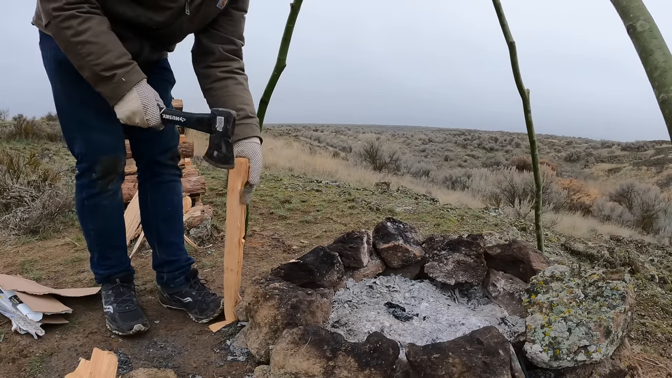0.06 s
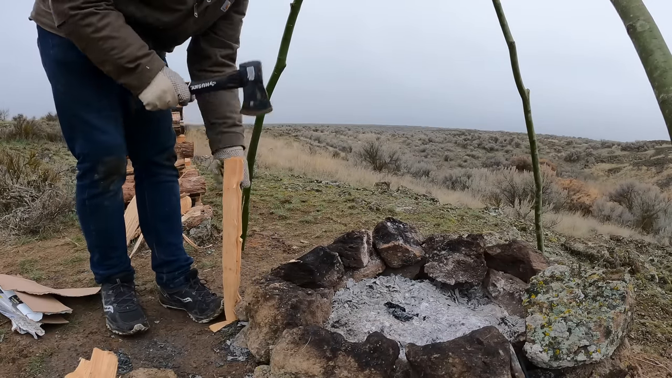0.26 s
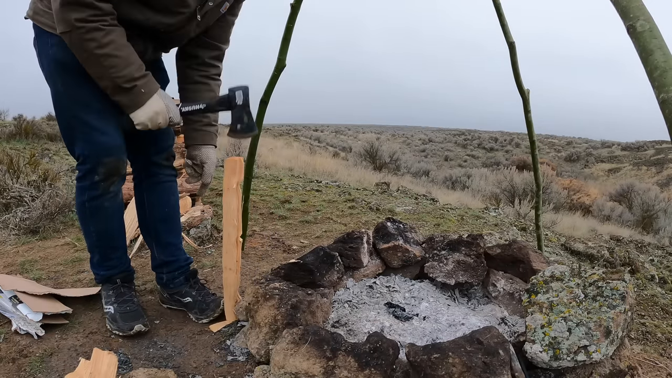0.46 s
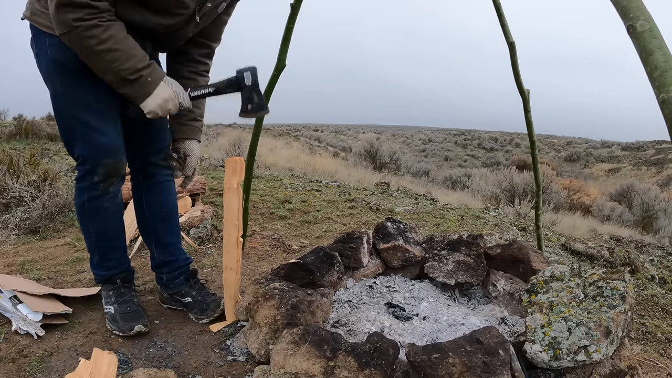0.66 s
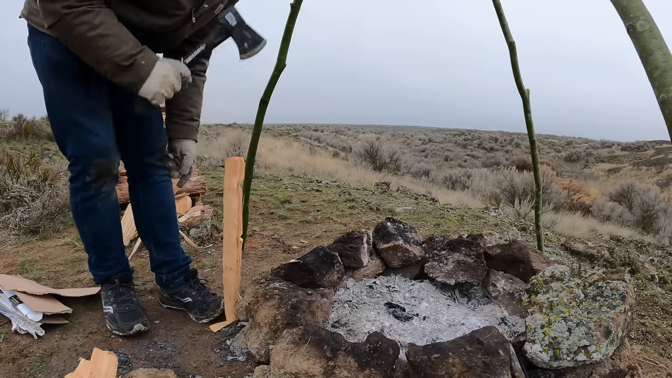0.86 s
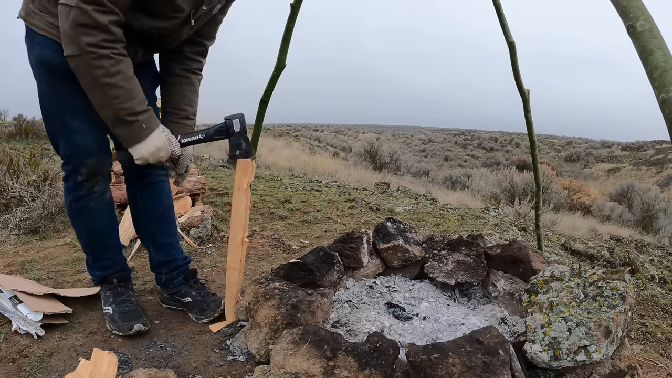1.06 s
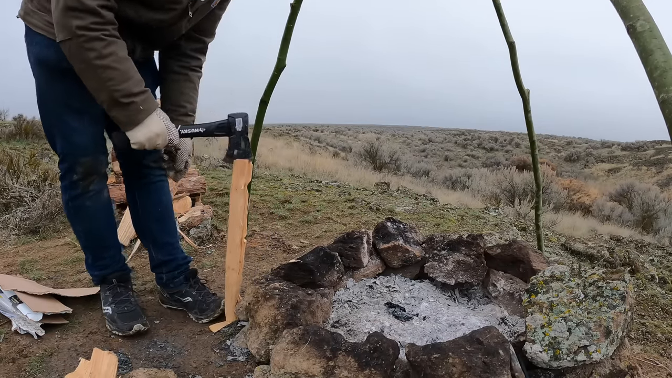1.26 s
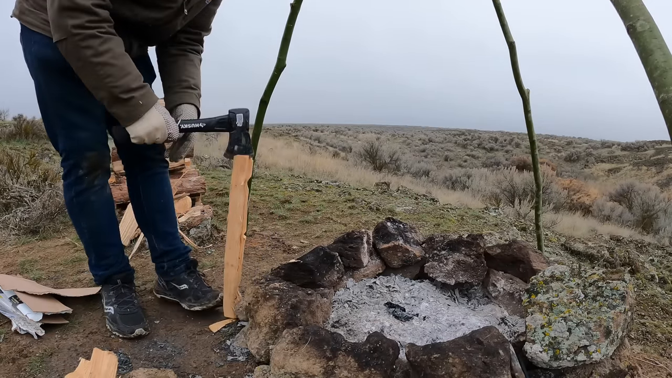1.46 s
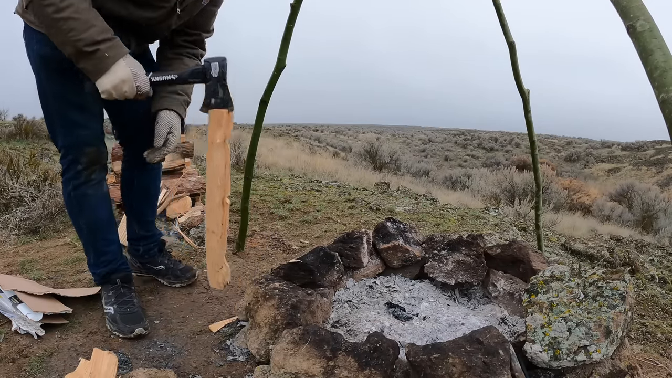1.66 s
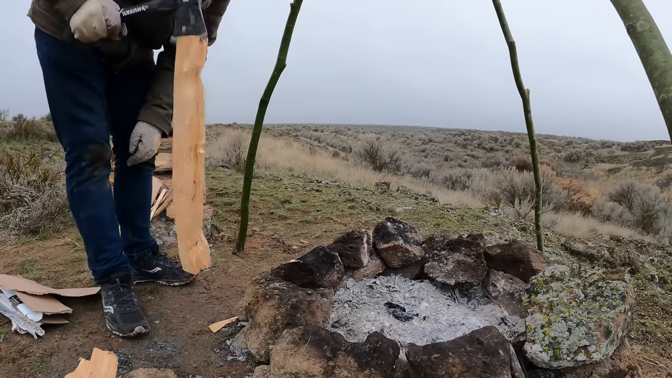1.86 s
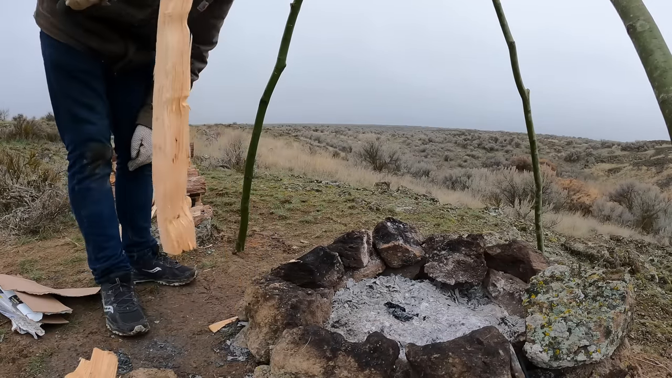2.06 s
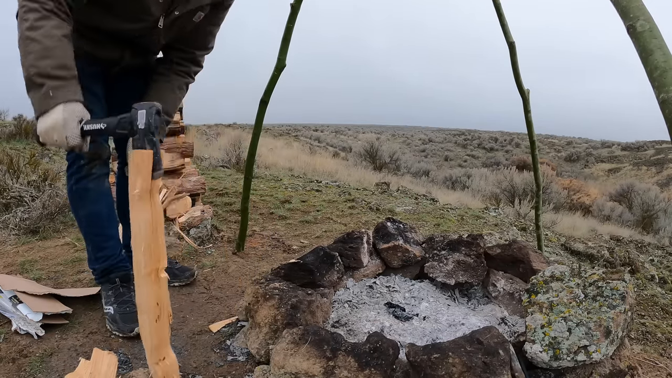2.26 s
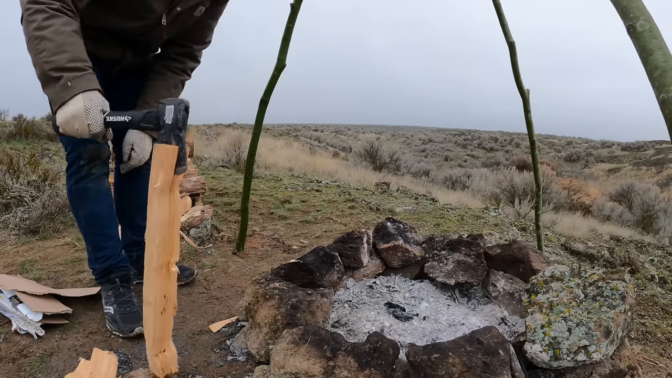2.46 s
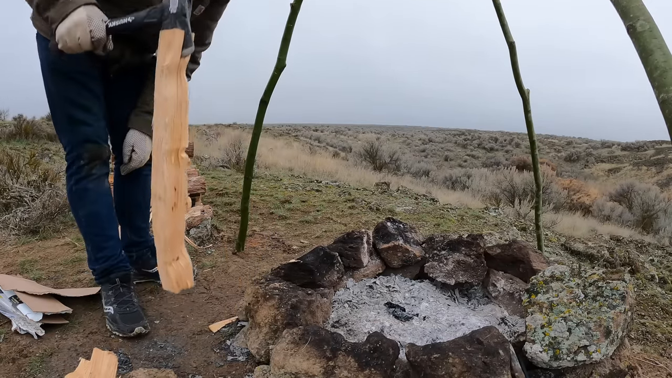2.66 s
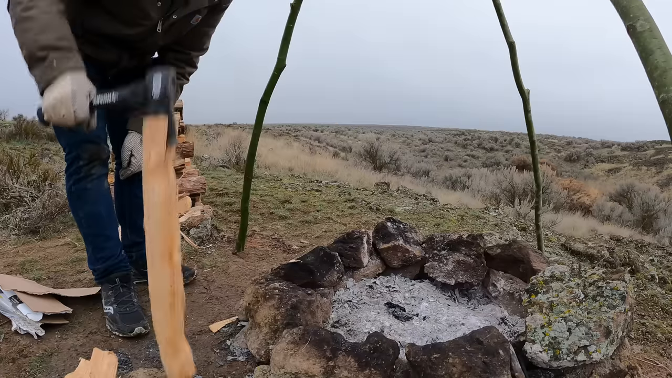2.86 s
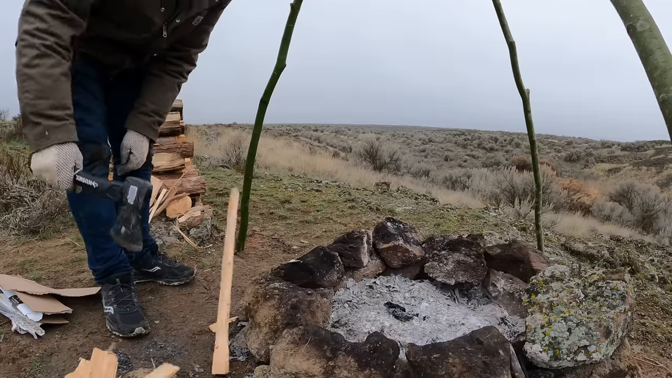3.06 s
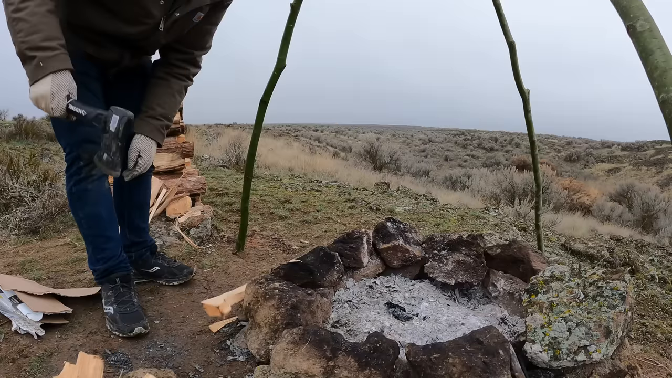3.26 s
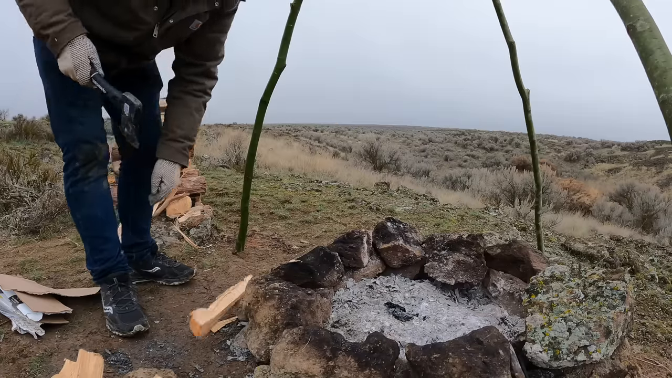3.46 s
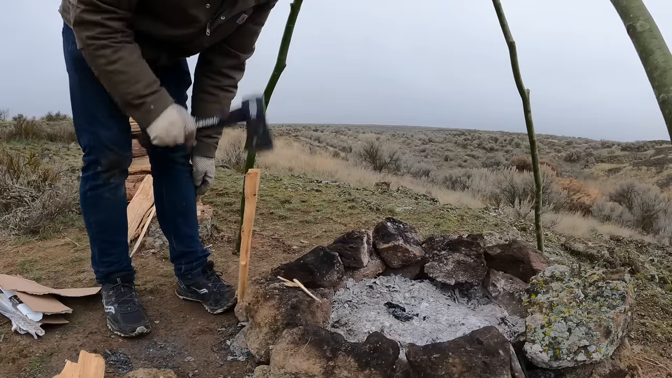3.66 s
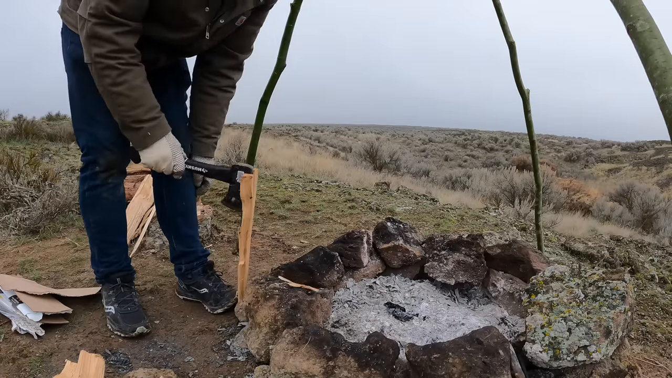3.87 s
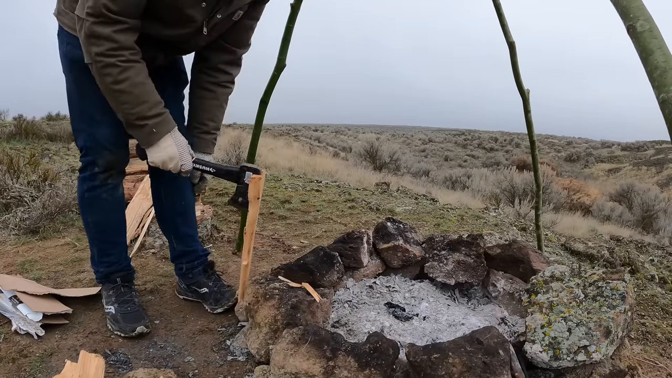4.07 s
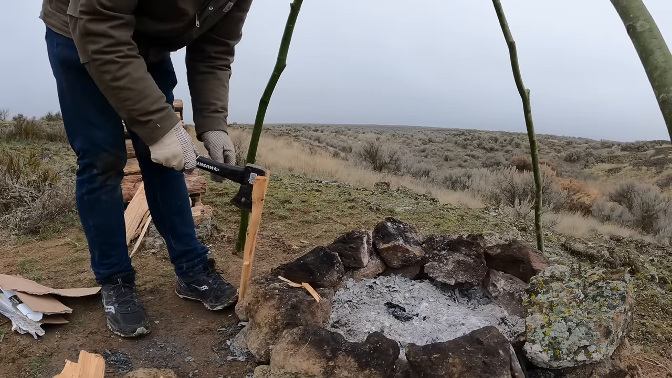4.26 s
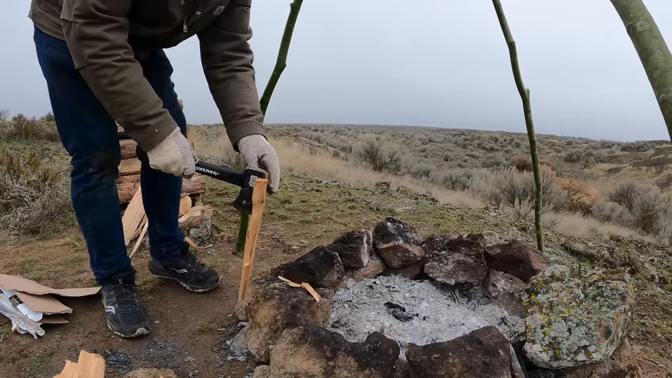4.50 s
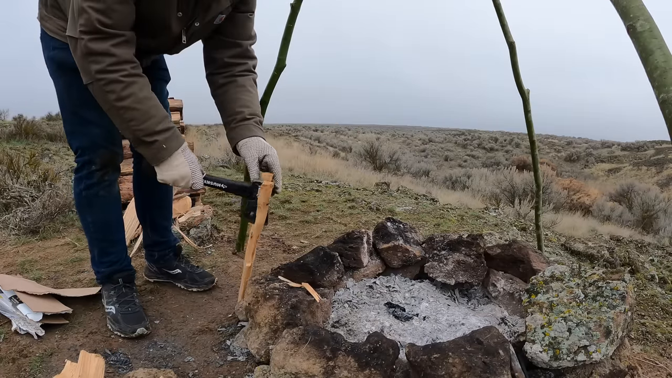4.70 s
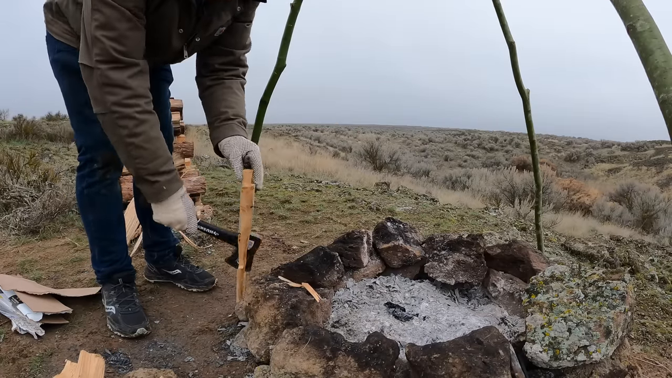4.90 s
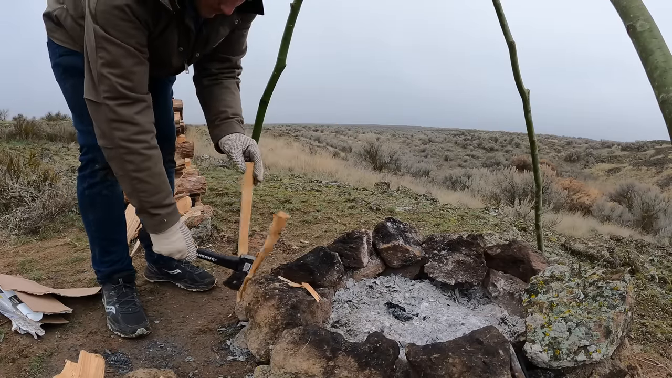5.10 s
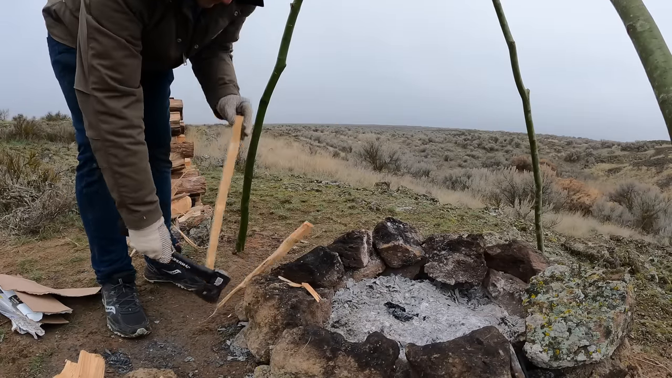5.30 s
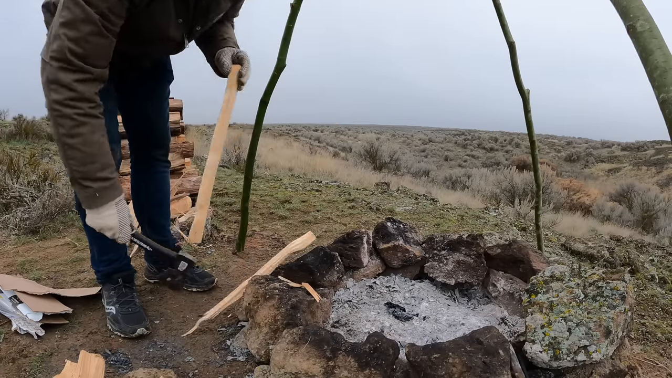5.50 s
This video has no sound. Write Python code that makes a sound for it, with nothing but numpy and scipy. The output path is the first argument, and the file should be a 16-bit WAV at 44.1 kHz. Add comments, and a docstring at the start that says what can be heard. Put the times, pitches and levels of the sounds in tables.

```python
"""Wooden taps, hard slams, ringing clacks and snapping fibres in rumbling wind: a hatchet splits a stick.
Each blow is a shower of tiny breaks with a dull thud and a short wood note; the fallen halves ring as bars.
One more blow bites into a half; the wedged blade creaks, then snaps and crackle pry the wood apart.
Shaped noise makes the wind, air and rustling clothes; a wavering sine hums far off on open ground."""
import sys
import numpy as np
from scipy import signal
from scipy.fft import rfft, irfft
from scipy.io import wavfile
from scipy.ndimage import uniform_filter1d

SR = 44100
rng = np.random.default_rng(int(sys.argv[2]) if len(sys.argv) > 2 else 0)


def store_pcm(level_fs):
    """Save levels as 16-bit WAV."""
    pcm = np.round(np.clip(level_fs, -1, 1) * 32767).astype(np.int16)
    wavfile.write(sys.argv[1], SR, np.atleast_2d(pcm).T)


N = 244314
TIME = np.arange(N) / SR  # the time of every sample [s]
LONG_HZ = np.fft.rfftfreq(N, 1 / SR)  # frequencies in the whole scene [Hz]
TAP_HZ = np.fft.rfftfreq(2048, 1 / SR)  # frequencies in one short click [Hz]


def amp(db):
    """Turns decibels into a plain multiplier."""
    return 10 ** (np.asarray(db) / 20)


def evened(x):
    """Scales a signal to an average strength (rms) of 1."""
    return x / np.sqrt(np.mean(x ** 2) + 1e-20)


def read(points, hz):
    """Reads a table's value at hz, with straight lines over log frequency."""
    f, value = np.transpose(points)
    return np.interp(np.log(hz + 1), np.log(f + 1), value)


def curve(rows, column=1):
    """Joins a table's points over time into a value for every sample."""
    rows = np.array(rows)
    return np.interp(TIME, rows[:, 0], rows[:, column])


def add(mix, s, sound):
    """Mixes a sound in, starting at s seconds."""
    part = mix[max(round(s * SR), 0):][:len(sound)]
    part += sound[:len(part)]


def fade(t, t60):
    """Exponential decay: t60 is the time [s] to drop by 60 dB."""
    return np.exp(-np.log(1000) * t / np.maximum(t60, 1e-3))


def tint(x, colour):
    """Filters a scene-long sound by a table of levels over frequency, then evens it."""
    return evened(irfft(rfft(x) * amp(read(colour, LONG_HZ)), N))


def causal(db):
    """Turns a spectrum into a minimum-phase click: its energy, 1 in all, comes as early as it can."""
    log_gain = np.log(amp(np.maximum(db - db.max(), -80)))
    mirrored = np.r_[log_gain, log_gain[-2:0:-1]]
    click = np.fft.ifft(np.exp(np.conj(signal.hilbert(mirrored)))).real
    return click / np.linalg.norm(click)


def burst(t60, colour_db, first=0.1, hold_s=0):
    """One abrupt break (of relative size first), then a coloured shower of tiny ones that holds and dies."""
    t = np.arange(SR // 8) / SR
    after = np.maximum(t - hold_s, 0)
    x = rng.standard_normal(len(t)) * fade(after, t60)
    x[0] = first * np.linalg.norm(x)
    for _ in range(2):
        # keeping only the phase flattens the spectrum; the fade then restores the dying shape
        flat = irfft(np.exp(1j * np.angle(rfft(x))), len(t))
        x = flat * fade(after, 4 * t60)
    x *= np.linalg.norm(fade(t, t60)) / np.linalg.norm(x)
    return signal.fftconvolve(x, causal(colour_db))[:len(t)]


def hump(hz, below_db, above_db):
    """A broad resonance whose skirts fall by so many dB an octave."""
    octaves = np.log2((TAP_HZ + 1) / hz)
    slope = np.where(octaves < 0, below_db, above_db)
    return -slope * (np.hypot(octaves, .5) - .5)


def uneven(depth_db):
    """Each spot on the stick favours other broad resonances: random dB over frequency."""
    wander = uniform_filter1d(rng.standard_normal(len(TAP_HZ)), size=14)
    return depth_db * evened(uniform_filter1d(wander, size=10))


def ring(modes):
    """Wood vibrates as several dying tones; each strike feeds them a little differently."""
    t = np.arange(SR // 2) / SR
    out = np.zeros(len(t))
    for hz, db, t60 in modes:
        strength = amp(db + rng.standard_normal()) * rng.choice([-1, 1])
        out += strength * fade(t, t60) * np.sin(2 * np.pi * hz * t)
    return out


def snaps(rows, level_db, ring_db, loud_t60, soft_t60):
    """Each small break clicks and briefly rings the stick; strong breaks are the most abrupt."""
    # resonances of the stick as it tears: (frequency [Hz], level [dB], t60 [s])
    splinter_modes = [(1540, -10.5, 0.023), (2480, -9.5, 0.065), (3180, -6, 0.049), (4250, -14.5, 0.044),
                      (4220, -4.5, 0.083), (6000, 4, 0.043), (6360, -8, 0.051), (7680, 5, 0.037)]
    out = np.zeros(N)
    for s, db, hz in rows:
        t60 = np.interp(db, [-20, 0], [soft_t60, loud_t60])
        # the higher the snap, the more steeply its treble falls
        treble_slope = np.interp(hz, [2000, 6000], [10, 25])
        colour = hump(hz, below_db=18.0, above_db=treble_slope) + uneven(depth_db=3.5)
        add(out, s, amp(db + level_db) * burst(t60, colour, first=0.74))
        add(out, s, amp(db + ring_db) * ring(splinter_modes))
    return out


def crackle(rows, colour, per_s, spread_db, level_db):
    """Random tiny breaks, each a millisecond of fizz, build to a climax and die."""
    happens = rng.random(N) < per_s / SR
    sizes = amp(spread_db * np.minimum(rng.exponential(1, N), 3)) * happens
    envelope = signal.lfilter([1], [1, -np.exp(-1 / (.001 * SR))], sizes)
    level = np.zeros(N)
    for s, db, rise, fall in rows:
        # before the climax the first term is the larger, after it the second
        drop_db = np.maximum(rise * (s - TIME), fall * (TIME - s))
        level += amp(db - drop_db)
    return amp(level_db) * level * tint(envelope * rng.standard_normal(N), colour)


def swells(rows, skirt_db):
    """Level of overlapping swells, rounded at the peak; far out each falls skirt_db per half-length."""
    power = np.zeros(N)
    for s, db, half_s in rows:
        drop_db = skirt_db * (np.hypot((TIME - s) / half_s, 1) - 1)
        power += amp(db - drop_db) ** 2
    return np.sqrt(power)


def pair(colour, side_db):
    """Noise at two microphones, partly shared."""
    mid, side = (tint(rng.standard_normal(N), colour) for _ in range(2))
    return evened(mid + amp(side_db) * np.array([side, -side]))


def place(x, left_db):
    """Sets a source between the ears: the left gets left_db more than the right."""
    return x * amp([[left_db / 2], [-left_db / 2]])


def hum():
    """A smooth far hum: one sine whose pitch and level drift."""
    # the far hum: (time [s], level [dB], pitch [Hz])
    hum_path = [(.25, -44, 142.5), (.8, -60.5, 140.4), (3.5, -65, 141.3), (3.68, -42, 138.3),
                (4.3, -35.5, 135.1), (4.6, -41.5, 137.8), (5.0, -45, 137), (5.54, -50, 137.6)]
    phase = 2 * np.pi * np.cumsum(curve(hum_path, column=2)) / SR
    return np.sqrt(2) * amp(curve(hum_path)) * np.sin(phase)


def air_and_clothes(air_db=-65, flutter_db=1.7):
    """Steady hiss of open country swells as clothes rustle with the arms; its level flutters."""
    # hiss of air and cloth: (frequency [Hz], level [dB])
    air_colour = [(200, 3.5), (400, -3.5), (750, -9), (1300, -1), (1700, -2.5), (3000, -8.5), (7000, -8),
                  (8500, -17), (12500, -26.5), (16000, -55.5)]
    # clothes rustling with each move of the arms: (time of the peak [s], level [dB], half-length [s])
    rustle_rows = [(.04, -48.5, 0.027), (.42, -55.5, 0.05), (.71, -56, 0.092), (.87, -52.5, 0.043),
                   (1.13, -52.5, 0.06), (1.56, -55.5, 0.15), (1.84, -46.5, 0.031), (1.99, -52.5, .08),
                   (2.36, -48.5, 0.026), (2.58, -54, 0.027), (3.03, -44, 0.018), (3.3, -55, 0.28),
                   (4.56, -51, 0.098), (4.85, -44.5, 0.1), (5.15, -48.5, 0.13), (5.52, -39.5, 0.037)]
    flutter = evened(uniform_filter1d(rng.standard_normal(N), size=700))
    hiss = np.hypot(amp(air_db), swells(rustle_rows, skirt_db=10.5))
    return hiss * amp(flutter_db * flutter) * pair(air_colour, side_db=-10.5)


def wind(calm_db=-31, gust_db=-22):
    """Eddies buffet the microphones; strong gusts reach higher in pitch."""
    # the steady wind drops to a lull: (time [s], level [dB])
    breeze = [(3.1, -36), (3.55, -42.5)]
    # gusts on the microphones: (time of the peak [s], level [dB], half-length [s])
    gust_rows = [(.15, -32.5, 0.052), (.47, -17, 0.029), (.67, -18.5, 0.03), (.9, -30, 0.083),
                 (1.54, -32, 0.083), (2.25, -29, 0.085), (2.53, -18, 0.061), (3.08, -28.5, .1)]
    # spectrum of the calmer wind: (frequency [Hz], level [dB])
    calm_colour = [(10, -22.5), (30, 5.5), (60, -2), (100, -10.5), (170, -22), (260, -37.5), (600, -49),
                   (1300, -83.5)]
    # spectrum of the strong gusts: (frequency [Hz], level [dB])
    gust_colour = [(10, -27), (35, 3.5), (120, -2), (180, -13.5), (320, -32.5), (500, -41.5), (1300, -94)]
    level = np.hypot(amp(curve(breeze)), swells(gust_rows, skirt_db=8))
    # 0 is calm, 1 is a full gust
    gust = np.clip((20 * np.log10(level) - calm_db) / (gust_db - calm_db), 0, 1)
    eddies = np.sqrt(1 - gust) * pair(calm_colour, side_db=-10.5)
    eddies += np.sqrt(gust) * pair(gust_colour, side_db=-10)
    # even out the noise's own slow swings, so that the level above sets the loudness
    eddies /= np.sqrt(uniform_filter1d((eddies ** 2).mean(0), size=2500))
    return place(level * eddies, left_db=-4.0)


def scatter(x):
    """Ground and rocks return a short tail: noise that dies at its own rate in each pitch range."""
    # how long the ground and rocks answer: (frequency [Hz], t60 [s])
    scatter_times = [(200, 0.31), (1000, 0.061), (4000, 0.11), (12000, 0.066)]
    hz, t, z = signal.stft(rng.standard_normal((2, SR // 2)), SR, nperseg=256)
    dying = z * fade(t, read(scatter_times, hz)[:, None])
    tail = signal.istft(dying, SR, nperseg=256)[1]
    return signal.fftconvolve(x[None], tail / np.linalg.norm(tail[0]), axes=1)[:, :N]


def grit():
    """Wood and blade scuff soil and splinters in showers of tiny breaks of nearly equal size."""
    # scuffs: (time of the climax [s], level [dB], rise [dB per s], fall [dB per s])
    scuffs = [(.285, -41.5, 199, 307), (.37, -37, 358, 602), (3.06, -36, 650, 298),
              (3.33, -35.5, 424.5, 91), (3.605, -49.5, 610, 647), (3.85, -30.5, 675, 334)]
    # spectrum of the scuffs: (frequency [Hz], level [dB])
    grit_colour = [(240, -43), (400, -12.5), (1570, -4.5), (3890, -6), (10100, -15.5), (15000, -34.5)]
    return crackle(scuffs, grit_colour, per_s=1100, spread_db=-0.5, level_db=4.0)


def ticks():
    """The blade catches in the grain and wood ticks on grit, each with a click and a faint ring."""
    # ticks: (time [s], level [dB], centre [Hz])
    tick_rows = [(0.283, -15.5, 3100), (0.293, -22, 3830), (0.363, -15, 2180), (0.369, -16.5, 4180),
                 (2.389, -15, 898), (2.407, -10, 4240), (3.029, -14.5, 878), (3.144, -28.5, 4230),
                 (3.335, -6, 1800), (3.667, -27.5, 1260), (3.845, -8, 6160), (3.864, -17.5, 4720),
                 (3.878, -10.5, 5580), (4.895, -22, 1490), (5.181, -15, 2680)]
    return snaps(tick_rows, level_db=-9, ring_db=-23, loud_t60=0.023, soft_t60=0.059)


def creaks(click_db=-9, ring_db=-5, t60=0.026):
    """The wedged blade is twisted: each slip clicks and rings the gripped stick."""
    # slips of the blade: (time [s], level [dB])
    slips = [(4.076, -29), (4.175, -24.5), (4.206, -27), (4.230, -30.5), (4.256, -38.5)]
    # the stick gripping the blade: (frequency [Hz], level [dB], t60 [s])
    gripped_modes = [(1380, -7, .025), (1657, -7, 0.034), (3010, -3, 0.019), (4190, -3.5, 0.015),
                     (6230, -10, 0.014)]
    out = np.zeros(N)
    for s, db in slips:
        add(out, s, amp(db + click_db) * burst(t60, hump(3140, below_db=18, above_db=8)))
        add(out, s, amp(db + ring_db) * ring(gripped_modes))
    return out


def landings(level_db=-4, contact_t60=.14):
    """Loose pieces clack on stone and soil and ring as bars; the next contact damps what still rings."""
    # loose pieces knocking, landing and bouncing: (time [s], level [dB], centre [Hz], t60 [s],
    # ring of the thin half [dB], ring of the thick half [dB])
    contacts = [(0.25, -10, 93, 0.018, -44, -42), (2.353, -34.5, 1790, 0.024, -27, -20),
                (2.954, -40.5, 3080, 0.016, -36, -19), (3.059, -17, 1510, 0.034, -2.5, -19),
                (3.263, -8, 1980, 0.069, -4.5, -36), (3.318, -11, 830, 0.065, -16, 1),
                (3.440, -23, 650, 0.059, -5.5, -10), (3.480, -27, 2480, 0.07, -12, -12),
                (3.504, -29.5, 2930, 0.013, -13, -28), (3.583, -27.5, 1014, 0.15, -11.5, -9.5),
                (4.685, -27.5, 226, 0.028, -15.5, -57), (4.915, -15.5, 128.7, 0.011, -49, -31),
                (5.341, -27.5, 3570, 0.16, -43, -41), (5.367, -23, 4200, 0.032, -73, -53),
                (5.398, -34.5, 3480, 0.12, -31, -32), (5.422, -32.5, 3520, 0.031, -26, -36),
                (5.498, -22.5, 4020, 0.074, -23.5, -39)]
    # bending modes of the thin half: (frequency [Hz], level [dB], t60 [s])
    thin_modes = [(296.3, -16.5, .55), (436, -25.5, 0.44), (756, -22, 0.22), (1187, -11, .14),
                  (1453, -5.5, 0.2), (1560, -1, 0.064), (2140, -7, 0.062), (2457, -5.5, 0.051),
                  (3440, -20, .1)]
    # bending modes of the thick half: (frequency [Hz], level [dB], t60 [s])
    thick_modes = [(289.4, -11.5, 0.14), (454, -20, 0.24), (805, -2, 0.17), (1093, -19, 0.18),
                   (1595, -12, 0.24), (1820, -25.5, 0.17), (2465, -14.5, .12), (2472, -14.5, 0.11),
                   (3034, -22.5, .14), (4420, -21.5, 0.16)]
    out, t = np.zeros(N), np.arange(SR // 2) / SR
    next_contacts = [row[0] for row in contacts[1:]] + [TIME[-1]]
    for (s, db, hz, t60, thin_db, thick_db), next_s in zip(contacts, next_contacts):
        add(out, s, amp(db + level_db) * burst(t60, hump(hz, below_db=3.5, above_db=13.5)))
        bars = amp(thin_db) * ring(thin_modes) + amp(thick_db) * ring(thick_modes)
        damping = fade(np.maximum(s + t - next_s, 0), contact_t60)
        add(out, s, amp(db) * bars * damping)
    return out


def prying():
    """Fibre bundles give way one after another over the crackle of the running split."""
    # bundles of fibres snapping as the half is pried apart: (time [s], level [dB])
    fibres = [(4.868, -0.5), (4.876, 0.5), (4.914, 4.5), (4.936, -10), (4.949, -11.5), (5.019, 0.5),
              (5.038, -8.5), (5.067, -2), (5.105, -8), (5.126, -12.5), (5.165, -7), (5.201, -12),
              (5.22, -15), (5.228, -10)]
    # snaps sound lower once the split opens: (time [s], centre [Hz])
    fibre_pitch = [(5.12, 5860), (5.17, 3940)]
    # the split running along the grain: (time of the climax [s], level [dB], rise [dB per s], fall [dB per s])
    tears = [(5.19, -27, 87, 340), (5.35, -36.5, 454.5, 550)]
    # spectrum of the tearing: (frequency [Hz], level [dB])
    tear_colour = [(350, -21), (600, -16), (2340, -21), (2570, -7), (7450, 0), (12300, -6.5), (15000, -26)]
    rows = [(s, db, np.interp(s, *np.transpose(fibre_pitch))) for s, db in fibres]
    bundles = snaps(rows, level_db=-7.5, ring_db=-28.5, loud_t60=0.013, soft_t60=0.043)
    return bundles + crackle(tears, tear_colour, per_s=1300, spread_db=12.5, level_db=5)


def blows(level_db=-2, thud_t60=0.045, note_t60=0.0079):
    """The blade crushes the end grain, the wood answers with a damped note, the stick thuds into soil."""
    # hatchet blows and the stick slamming on the ground: (time [s], level [dB], bass [dB], treble [dB],
    # t60 [s], ground thud [dB], thud pitch [Hz], wood note [dB], note pitch [Hz]);
    # the thud and note levels are relative to the blow
    blow_rows = [(0.658, -3.5, -3.5, -22.5, 0.017, -8.5, 93, -9, 1750),
                 (1.094, 4, -6.5, -2, 0.0084, -26.5, 108.2, -9.5, 2400),
                 (2.399, 3.5, 5.5, -3, 0.016, -9.5, 245, -4, 3000),
                 (2.416, -13, 4.5, 7.5, 0.046, -1, 151.6, -24, 4870),
                 (3.040, 0, 3, -7.5, .015, -11.5, 295, 7.5, 1210),
                 (3.055, -7.5, 4.5, 8, 0.026, -7, 118, -14, 2400),
                 (3.837, 0.5, -1, 12, 0.012, -10.5, 198, -5, 3250)]
    # spectrum shared by all blows: (frequency [Hz], level [dB])
    blow_colour = [(70, -1), (350, 2.5), (850, -4.5), (2000, 0), (5000, -2), (10000, -16.5), (16500, -46)]
    # where a blow's bass setting acts: (frequency [Hz], share of its dB)
    bass_shelf = [(850, 1), (2000, 0)]
    # where a blow's treble setting acts: (frequency [Hz], share of its dB)
    treble_shelf = [(2000, 0.5), (5000, 1.03), (9000, 1.06)]
    out, t = np.zeros(N), np.arange(SR // 4) / SR
    for s, db, bass_db, treble_db, t60, thud_db, thud_hz, note_db, note_hz in blow_rows:
        colour = read(blow_colour, TAP_HZ)
        colour = colour + bass_db * read(bass_shelf, TAP_HZ)
        colour = colour + treble_db * read(treble_shelf, TAP_HZ)
        add(out, s, amp(db + level_db) * burst(t60, colour, first=.3, hold_s=0.0023))
        add(out, s, amp(db + thud_db) * fade(t, thud_t60) * np.sin(2 * np.pi * thud_hz * t))
        add(out, s, amp(db + note_db) * fade(t, note_t60) * np.sin(2 * np.pi * note_hz * t))
    return out


def scene():
    """The woodwork, a little to the left, in wind and open country."""
    wood = grit() + ticks() + creaks() + landings() + prying() + blows()
    # sound reaches the right microphone 0.45 of a sample later
    lag = np.exp(-2j * np.pi * np.fft.rfftfreq(N) * .45)
    direct = place(np.array([wood, irfft(rfft(wood) * lag, N)]), left_db=1.75)
    return direct + amp(-19) * scatter(wood) + wind() + air_and_clothes() + hum()


def record(dry):
    """The microphone dulls the top, peaks beyond full scale are clipped, then a low-pass limits the band."""
    # the microphone dulls the highest treble: (frequency [Hz], level [dB])
    mic_top = [(12500, 0), (14500, -6.5), (16500, -11.5)]
    heard = irfft(rfft(dry) * amp(read(mic_top, LONG_HZ)), N)
    low_pass = signal.firwin(255, 16500, window=("kaiser", 8), fs=SR)  # cutoff in Hz
    return signal.oaconvolve(np.clip(heard, -1, 1), low_pass[None], "same")


dry = scene()
out = record(dry)
store_pcm(out)
```